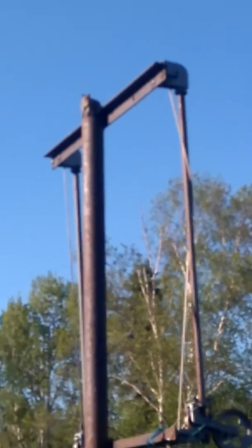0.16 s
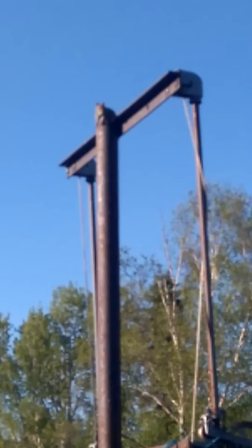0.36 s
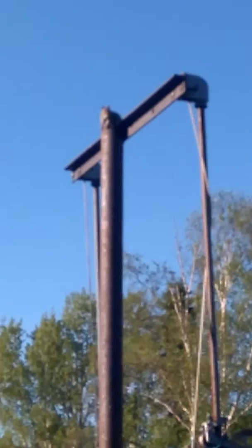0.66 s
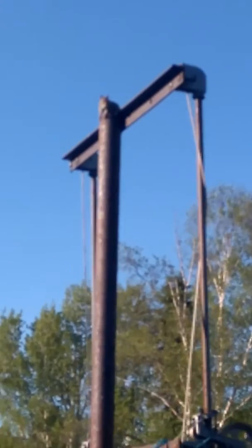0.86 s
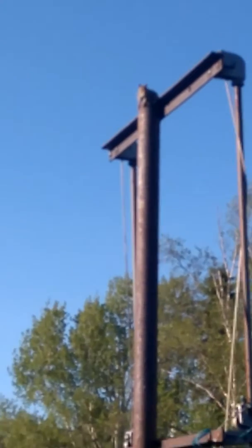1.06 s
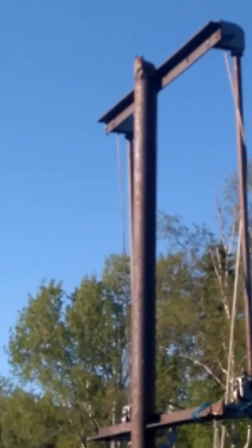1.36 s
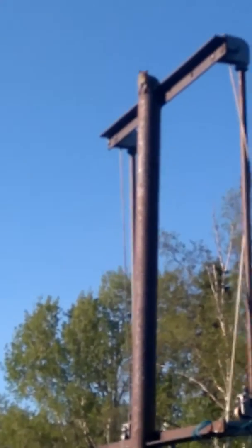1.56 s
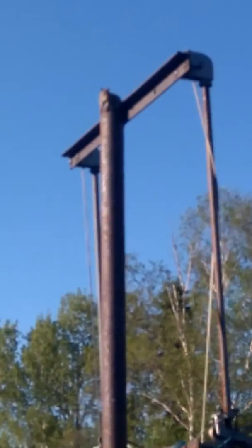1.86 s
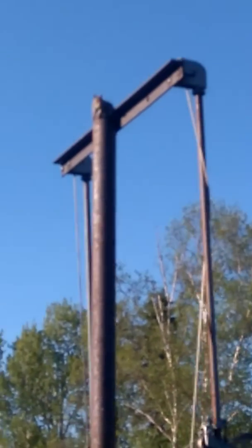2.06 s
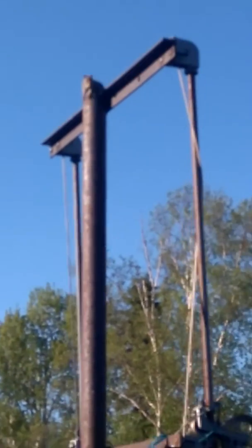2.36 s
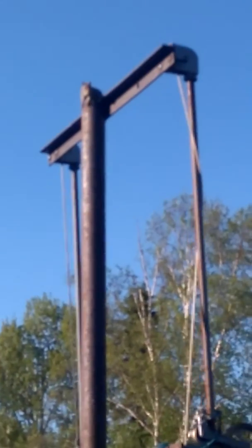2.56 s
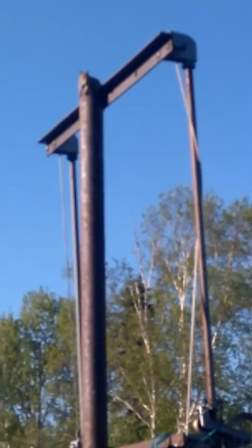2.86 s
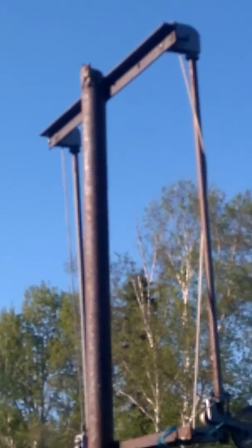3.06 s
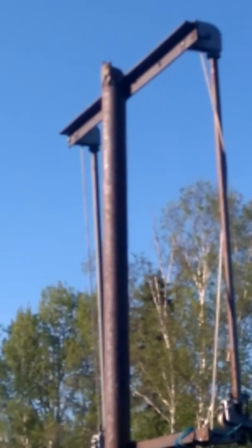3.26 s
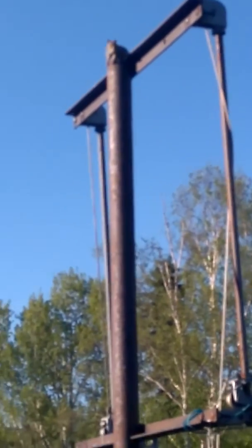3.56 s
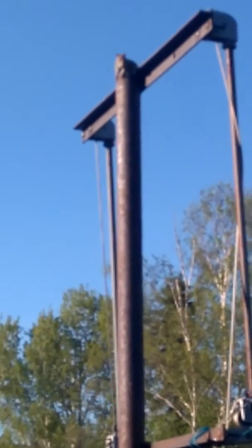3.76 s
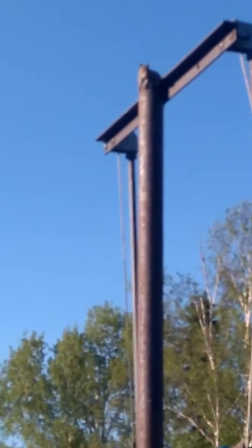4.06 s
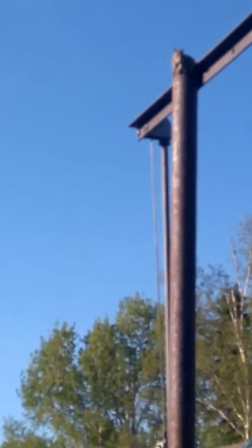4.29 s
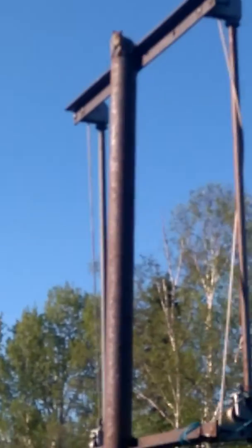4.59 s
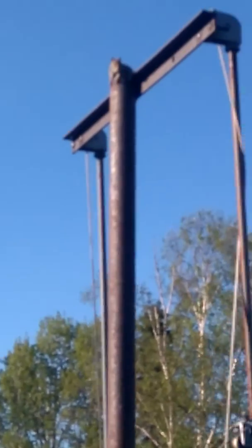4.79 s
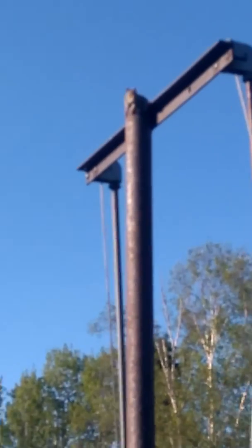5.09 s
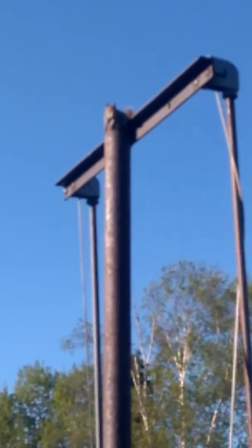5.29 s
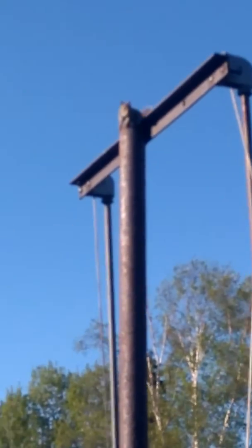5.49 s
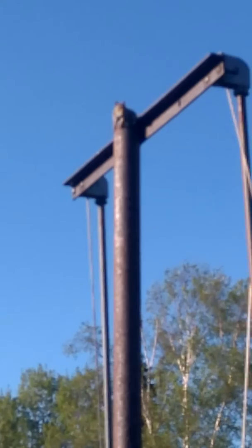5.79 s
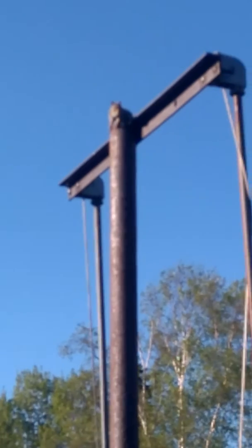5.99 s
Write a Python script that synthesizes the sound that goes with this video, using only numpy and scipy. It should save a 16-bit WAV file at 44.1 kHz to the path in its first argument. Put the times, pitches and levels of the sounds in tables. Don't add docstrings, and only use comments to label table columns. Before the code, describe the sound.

Outdoors, a small rodent on a high post gives sharp, very short whistled chips, about five or six a second, uneven in loudness. Two chips are followed at once by harsh, raspy barks. Each call scatters briefly off steel and trees, and a faint single echo returns from the right. A distant crow caws hoarsely and tiny birds peep. Soft hiss swells with each call; the microphone is handheld, slightly rubbed by fingers.

```python
import sys
import numpy as np
from scipy import signal
from scipy.fft import rfft, irfft
from scipy.io import wavfile
from scipy.ndimage import uniform_filter1d

SR = 44100
rng = np.random.default_rng(int(sys.argv[2]) if len(sys.argv) > 2 else 0)


def natural_amplitude(level_db):
    exponent = np.asarray(level_db, float) / 20
    return 10 ** exponent


def wrap_up_sound(samples):
    columns = np.atleast_2d(samples).T
    tamed = np.clip(columns, -1, 1)
    steps = np.round(tamed * 32767).astype(np.int16)
    wavfile.write(sys.argv[1], SR, steps)


N = 270774
LEAD_IN = 8192


def curve(points, hz):
    table_hz, values = np.transpose(points)
    return np.interp(np.log(hz + 1), np.log(table_hz), values)


def rms_one(x):
    return x / np.sqrt(np.mean(x ** 2) + 1e-20)


def filtered(x, order, hz, kind="low"):
    return signal.sosfilt(signal.butter(order, hz, kind, fs=SR, output="sos"), x)


def coloured(x, points):
    hz = np.arange(x.shape[-1] // 2 + 1) * SR / x.shape[-1]
    return irfft(rfft(x) * natural_amplitude(curve(points, hz)), x.shape[-1])


def wobble(size, hz):
    settle = 999
    white = rng.standard_normal(size + settle)
    return rms_one(filtered(white, 2, hz)[settle:])


def add(track, x, s):
    at = LEAD_IN + round(s * SR)
    x = x[:, :max(track.shape[1] - at, 0)]
    track[:, at:at + x.shape[1]] += x


# (f/Hz, level/dB)
AIR_COLOUR = [(18, -37), (30, -9), (60, -10.5), (310, -12.5), (1130, -18.5), (2890, -23.5), (3290, -21),
              (3550, -25), (4150, -25.5), (4980, -27.5), (7350, -27.5), (8580, -24), (14800, -37)]
# (f/Hz, likeness 0 to 1)
LIKENESS = [(40, .72), (150, .78), (300, .58), (600, .45), (1500, .2), (4000, .05)]
# (f/Hz, level/dB)
LEFT_LEAN = [(40, -8), (150, -3), (600, -0.94), (3000, -1.5), (12000, 1)]


def air():
    hz = np.arange(N // 2 + 1) * SR / N
    mid, side = rfft(rng.standard_normal((2, N)))
    alike = np.clip(curve(LIKENESS, hz), 0, 1)
    lean = natural_amplitude(curve(LEFT_LEAN, hz) / 2)
    left, right = np.sqrt(1 + alike) * mid + np.sqrt(1 - alike) * side * [[1], [-1]]
    noise = irfft(natural_amplitude(curve(AIR_COLOUR, hz)) * [left * lean, right / lean], N)
    return natural_amplitude(-55.5 + 1.1 * wobble(N, hz=27)) * rms_one(noise)


# (t/s, level/dB)
BREEZE = [
    (0, -63.5),
    (1, -70.5),
    (2, -70),
    (2.8, -66),
    (3.1, -84),
    (4.502, -72.5),
    (6.14, -77),
]


def breeze():
    s, level_db = np.transpose(BREEZE)
    shared, left, right = rng.standard_normal((3, N))
    ports = np.array([shared + .4 * left, .6 * shared + .25 * right])
    rumble = rms_one(filtered(ports, 2, [45, 110], "band"))
    gusts_db = np.interp(np.arange(N) / SR, s, level_db)
    return natural_amplitude(gusts_db + 0.83 * wobble(N, hz=1.3)) * rumble


# (t/s, level/dB, length/s)
RUSTLES = [
    (4.476, -59, 0.091),
    (4.656, -51, 0.094),
    (5.262, -59.5, .06),
]


def fingers():
    track = np.zeros((2, LEAD_IN + N))
    for s, level_db, length in RUSTLES:
        u = np.linspace(0, 1, round(length * SR))
        grains = rng.standard_normal((2, len(u))) * natural_amplitude(2.3 * wobble(len(u), hz=150))
        rub = rms_one(filtered(grains, 3, [300, 3800], "band"))
        add(track, natural_amplitude(level_db) * np.sin(np.pi * u) * rub, s)
    return track[:, LEAD_IN:]


# (t/s, pitch f/Hz, level/dB, length/s)
NOTES = [
    (.519, 5500, -56, .038),
    (.62, 7150, -71, .08),
    (2.6, 2460, -60, .12),
    (3.3, 2350, -63, .08),
    (3.59, 7200, -65, .15),
]


def thin_notes():
    track = np.zeros((2, LEAD_IN + N))
    for s, pitch_hz, level_db, length in NOTES:
        u = np.linspace(0, 1, round(length * SR))
        phase = 2 * np.pi * np.cumsum(pitch_hz * (1 + 0.0038 * wobble(len(u), hz=60))) / SR
        swell = natural_amplitude(level_db + 2.5 * wobble(len(u), hz=40)) * np.sin(np.pi * u) ** .5
        add(track, swell * np.sin(phase) * np.ones((2, 1)), s)
    return track[:, LEAD_IN:]


# (t/s, throat f/Hz, level/dB, length/s)
CAWS = [
    (-.03, 1600, -57, 0.15),
    (0.061, 1720, -53, 0.233),
    (1.162, 1630, -57, 0.159),
    (3.526, 1750, -52.5, .28),
    (5.993, 1700, -53, 0.21),
]


def far_crow():
    track = np.zeros((2, LEAD_IN + N))
    for s, throat_hz, level_db, length in CAWS:
        u = np.linspace(0, 1, round(length * SR))
        cycles = np.cumsum(330 * (1 + .12 * wobble(len(u), hz=153))) / SR
        pulses = np.diff(np.floor(cycles), prepend=0)
        rasp = pulses * 8 + .5 * rng.standard_normal((2, len(u)))
        caw = rms_one(filtered(rasp, 2, [throat_hz / 1.14, throat_hz * 1.14], "band"))
        swell = natural_amplitude(level_db - 3.5 + 0.8 * wobble(len(u), hz=25.2)) * np.sin(np.pi * u) ** .5
        add(track, swell * caw, s)
    return track[:, LEAD_IN:]


def far_wall(call, rough, echo_db, beam_hz):
    beamed = filtered(call, 3, beam_hz, "band")
    beamed = signal.fftconvolve(beamed[None], rough, axes=1)[:, :len(call)]
    beamed *= np.sqrt(np.sum(call ** 2) / np.sum(beamed ** 2, axis=1, keepdims=True))
    return natural_amplitude([[echo_db - 17], [echo_db - 8.5]]) * beamed


def outdoors(call, pan_db, echo_db, beam_hz, habit):
    port_lag = 5
    t = np.arange(habit.shape[-1]) / SR
    paths = 1.51 * habit + 1.2 * rng.standard_normal(habit.shape)
    sparse = np.abs(habit[1]) > 2.3
    steelwork = natural_amplitude(-1.5) * paths[0] * sparse * natural_amplitude(-60 * t / 0.097) * (t > .001)
    tree_decay = natural_amplitude(-31 - 60 * t / 0.15) + natural_amplitude(-54.5 - 60 * t / 4.8) * (1 - t / t[-1])
    trees = paths[1] * tree_decay * np.clip(t / 0.002, 0, 1)
    dull = filtered(trees, 2, 8500)
    response = steelwork + dull + (trees - dull) * natural_amplitude(-60 * t / 0.18)
    response[[0, 1], [0, port_lag]] += natural_amplitude([pan_db / 2, -pan_db / 2]) * natural_amplitude(3.0)
    heard = signal.fftconvolve(call[None], response, axes=1)
    heard *= np.sqrt(np.sum(call ** 2) / np.sum(heard ** 2) * 2)
    rough = paths[1][:, :150] * natural_amplitude(-60 * t[:150] / .008)
    lag = round(.1178 * SR)
    heard[:, lag:lag + len(call)] += far_wall(call, rough, echo_db, beam_hz)
    return heard


def chip(level_db, top_hz, length):
    u = np.arange(round(length * SR)) / (length * SR)
    rising = 0.35 * np.abs(1 - u / .48) ** 2.6
    falling = 0.21 * np.abs((u - .48) / 0.46) ** 1.8
    sag = np.where(u < .48, rising, falling)
    pitch_hz = 1.012 * top_hz * (1 - sag) * (1 + 0.001 * wobble(len(u), hz=302))
    phase = 2 * np.pi * np.cumsum(pitch_hz) / SR
    swell = u ** 0.78 * (1 - u) ** .5 * natural_amplitude(-33 * sag)
    swell = swell / swell.max() * natural_amplitude(1.58 * wobble(len(u), hz=187))
    octave = natural_amplitude(-20.5 - 15 * sag + 2.5 * wobble(len(u), hz=400))
    whistle = natural_amplitude(level_db - 2.5) * swell * (np.sin(phase) + octave * np.sin(2 * phase))
    return filtered(whistle, 6, .79 * top_hz, "high")


VOICED_S, CHOKE_S = 0.042, 0.0047


def bark_effort(t, lead_s):
    hiss_db, burst_s, crest_s, sag_db = -22, 0.0016, 0.0067, 11.5
    sag = -sag_db * ((t - crest_s) / (VOICED_S - crest_s)) ** 2
    hiss = hiss_db * np.clip(-t / burst_s, 0, 1) - 18 * np.clip(1 - (t + lead_s) / .004, 0, 1)
    choke = -26 * np.clip((t - VOICED_S) / CHOKE_S, 0, 1)
    return np.where(t < 0, hiss, sag) + choke


def bark(peak_db, lead_s, top_hz, colour):
    slack_hz, taut_s = 1560, .022
    t = np.arange(round((lead_s + VOICED_S + CHOKE_S) * SR)) / SR - lead_s
    rate_hz = slack_hz + (top_hz - slack_hz) * np.clip(1 - (t / taut_s - 1) ** 2 / 2, 0, 1)
    phase = 2 * np.pi * np.cumsum(rate_hz * (1 + .03 * wobble(len(t), hz=300))) / SR
    folds = np.zeros(len(t))
    for k in range(1, 10):
        harmonic_db = 4 * wobble(len(t), hz=150) - 4 * (k < 3)
        folds += np.cos(k * phase + k * k) * natural_amplitude(harmonic_db)
    folds = folds * (1 + .5 * np.cos(phase / 4))
    breath = rng.standard_normal(len(t)) * (1 + .6 * np.cos(phase))
    breath = breath * natural_amplitude(3 * wobble(len(t), hz=700))
    voice = rms_one(coloured(rms_one(folds) + .6 * breath, colour))
    lows = filtered(voice, 4, 7400)
    highs = filtered(voice, 4, 7400, "high")
    opened = np.clip(t / .013, 0, 1)
    return natural_amplitude(peak_db + bark_effort(t, lead_s) + 3.0) * (highs + opened * lows)


# (t/s, peak level/dB, top pitch f/Hz, wall echo level/dB as the head turns)
CHIPS = [(-0.092, -20.5, 6380, -17.5), (0.1395, -20.5, 6574, -13), (0.3112, -23.5, 6542, -11.5),
         (0.7036, -25, 6420, -13), (0.9078, -26.5, 6676, -6.5), (1.095, -30.5, 6186, -16.5),
         (1.3034, -21.5, 6378, -15.5), (1.6155, -26, 6477, -14.5), (1.7678, -27.0, 6263, -24),
         (1.9457, -23.5, 6566, -15), (2.0908, -29.5, 6117, -21.5), (2.241, -23.5, 6740, -13),
         (2.415, -21, 6556, -17), (2.5855, -21.5, 6526, -16.5), (2.7418, -22, 6460, -19.5),
         (2.908, -29.5, 6210, -15), (3.1671, -28, 6220, -16),
         (3.5414, -27.0, 6474, -9.5), (3.7458, -19.5, 6445, -23.5), (3.9478, -23.5, 6780, -16.5),
              (4.1163, -22.5, 6688, -17), (4.2792, -24.0, 6574, -21), (4.4812, -23, 6490, -14.5),
              (4.6618, -23, 6370, -17), (4.829, -27.5, 6334, -14.5), (4.9739, -31, 5956, -21),
              (5.1212, -29.5, 6140, -25), (5.28, -36.5, 5482, -17.5), (5.4279, -20.5, 6880, -17.5),
              (5.612, -23, 6510, -12), (5.795, -24, 6480, -12), (5.9801, -24, 6413, -18),
              (6.1247, -28.5, 5950, -23)]
# (burst t/s, peak level/dB, hissed lead-in length/s, top fold rate f/Hz)
BARKS = [
    (1.336, -27.5, .016, 1694),
    (3.198, -26, 0.024, 1627),
]
# (f/Hz, level/dB)
BARK_COLOURS = [
    [(600, -39.5), (1000, -15.5), (1550, -9.5), (2250, -20.5), (2850, 0.5), (3500, -6.5), (4100, -3.5),
     (4800, -17.5), (5500, -10.5), (6800, -9.5), (9500, -4.5), (13300, -6.5), (14400, -10.5), (15200, -48)],
    [(600, -39.5), (1000, -11), (1550, -8.5), (2300, -19), (3150, 7), (3600, -19.5), (3950, 5),
     (4450, -20.5), (4900, -11), (6600, -6.5), (9800, -2), (13300, -8), (14600, -11.5), (15300, -62)],
]


def rodent():
    track = np.zeros((2, LEAD_IN + N))
    habit = rng.standard_normal((2, 2, 16000))
    for s, level_db, top_hz, echo_db in CHIPS:
        length = .0365 + 0.017 * (top_hz - 6494) / 1000 - .0009 * (level_db + 25)
        call = chip(level_db + 5.0, top_hz, length)
        heard = outdoors(call, pan_db=11.5, echo_db=echo_db, beam_hz=[5900, 8500], habit=habit)
        add(track, heard, s - .0095)
    for (s, peak_db, lead_s, top_hz), colour in zip(BARKS, BARK_COLOURS):
        call = bark(peak_db, lead_s, top_hz, colour)
        heard = outdoors(call, pan_db=2, echo_db=-18, beam_hz=[2500, 13500], habit=habit)
        add(track, heard, s - lead_s)
    return track[:, LEAD_IN:]


def scene():
    return air() + breeze() + fingers() + thin_notes() + far_crow() + rodent()


def gate(x, open_db, ratio, shut_db, shut_ratio, smooth_s):
    r = np.exp(-1 / (smooth_s * SR))
    power = signal.lfilter([1 - r], [1, -r], np.mean(x ** 2, axis=0), zi=[natural_amplitude(2 * shut_db + 16)])[0]
    level_db = 10 * np.log10(power + 1e-12)
    soft = -np.logaddexp(0, ratio * (open_db - level_db) / 4) * 4
    steep = -np.logaddexp(0, shut_ratio * (shut_db - level_db))
    gain_db = np.maximum(soft + steep, -27)
    return x * uniform_filter1d(natural_amplitude(gain_db), size=200)


# (lowest f/Hz, highest f/Hz)
MASKED_HZ = [(4050, 4750), (7350, 8100), (8100, 8900)]


def masked(x, margin_db):
    hz, s, cells = signal.stft(x, SR, nperseg=1024)
    power = np.mean(np.abs(cells) ** 2, axis=0)
    whistle = power[(hz > 5000) & (hz < 7200)].mean(axis=0)
    for low, high in MASKED_HZ:
        band = (hz > low) & (hz < high)
        beside = power[band].mean(axis=0)
        excess_db = 10 * np.log10(whistle / (beside + 1e-20) + 1e-9) - margin_db
        excess_db = np.minimum(excess_db, np.roll(excess_db, 1))
        cells[:, band] *= natural_amplitude(-np.clip(8 * excess_db, 0, 30))
    return signal.istft(cells, SR, nperseg=1024)[1][:, :N]


def band_limit(x):
    return signal.sosfilt(signal.butter(12, 14970, fs=SR, output="sos"), x)


def record(dry):
    x = filtered(dry, 4, 48, "high")
    x = gate(x, open_db=-34.0, ratio=0.84, shut_db=-52.5, shut_ratio=2.5, smooth_s=0.0093)
    mirror = filtered(x, 8, 7600) * np.cos(2 * np.pi * 16000 * np.arange(N) / SR)
    x = x + natural_amplitude(-24) * filtered(mirror, 3, [8200, 10200], "band")
    x = signal.sosfilt(signal.cheby2(10, 60, 15300, fs=SR, output="sos"), x)
    x = masked(x, margin_db=15)
    return band_limit(x)


dry = scene()
out = record(dry)
wrap_up_sound(out)
```